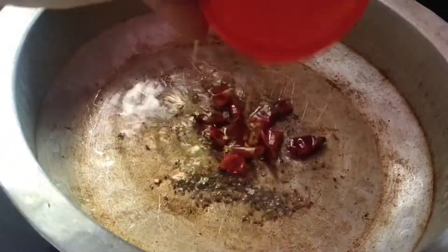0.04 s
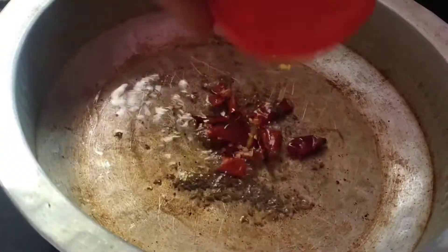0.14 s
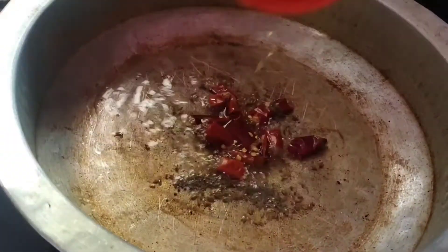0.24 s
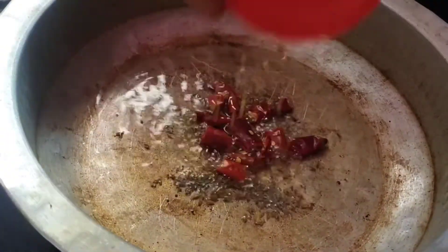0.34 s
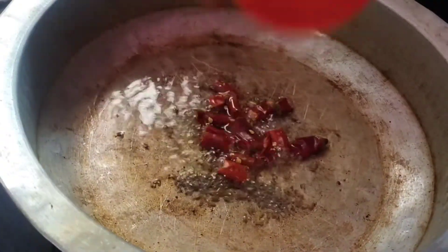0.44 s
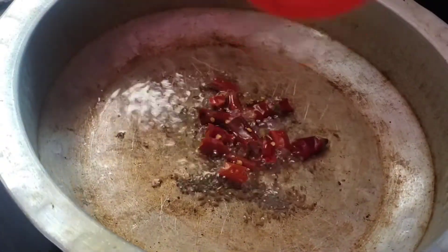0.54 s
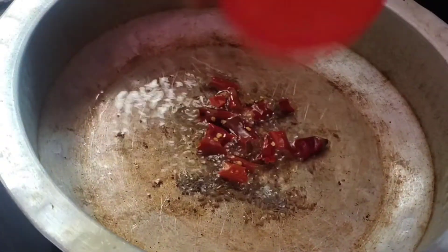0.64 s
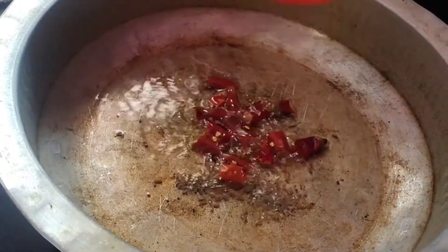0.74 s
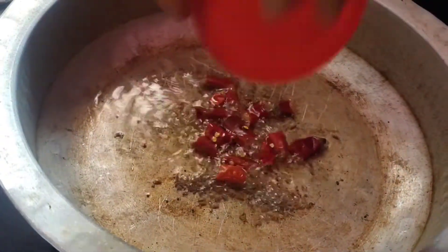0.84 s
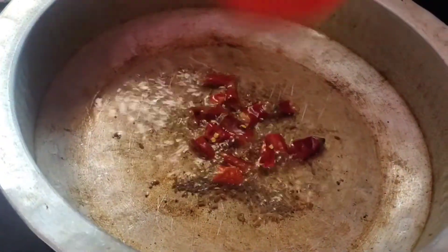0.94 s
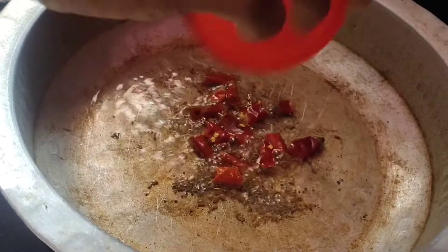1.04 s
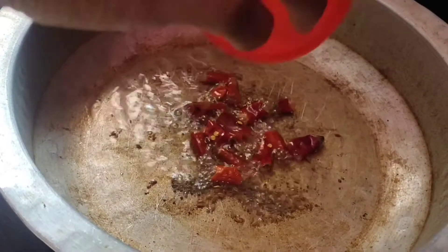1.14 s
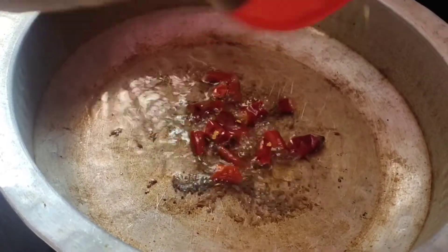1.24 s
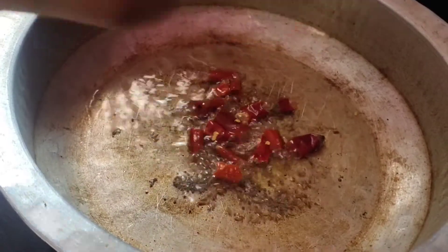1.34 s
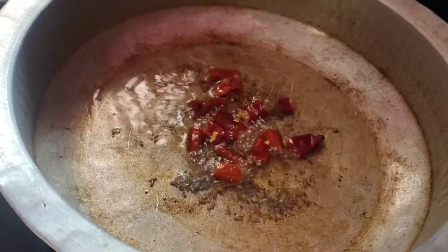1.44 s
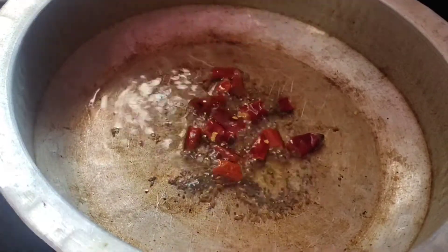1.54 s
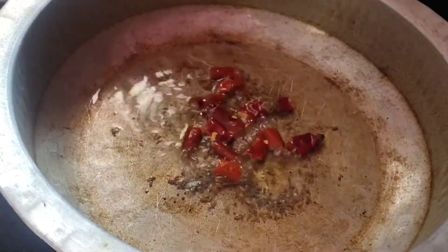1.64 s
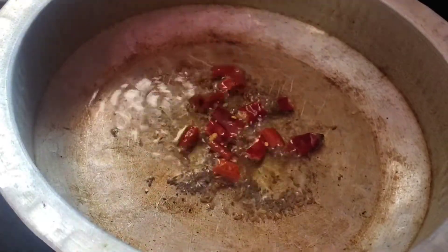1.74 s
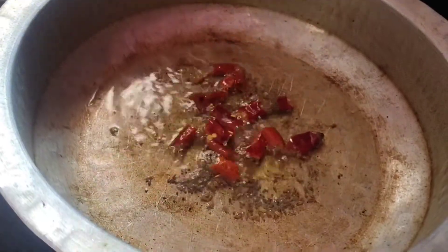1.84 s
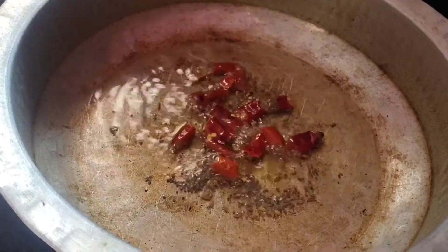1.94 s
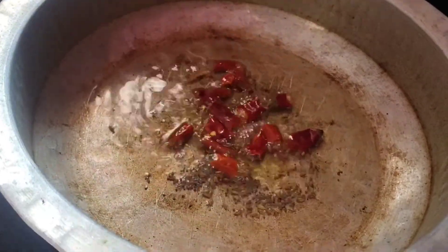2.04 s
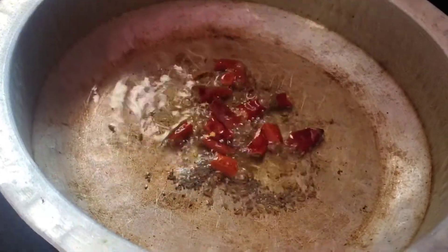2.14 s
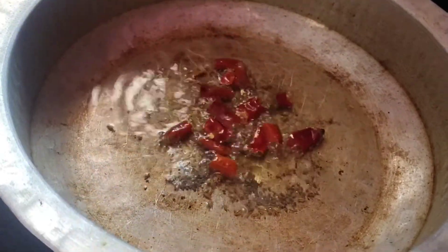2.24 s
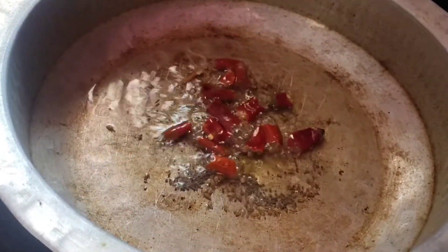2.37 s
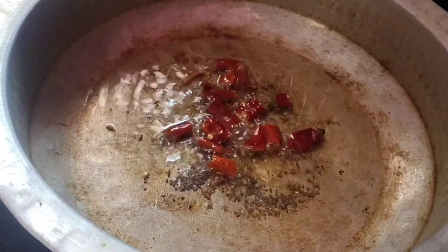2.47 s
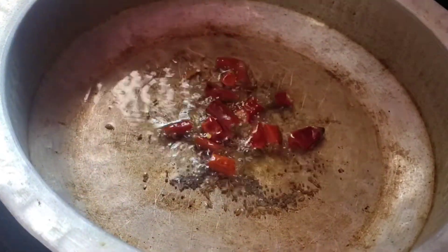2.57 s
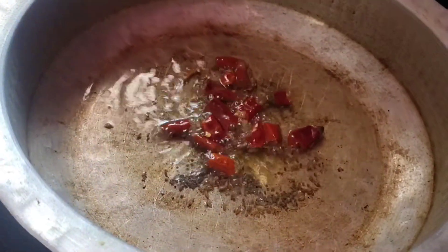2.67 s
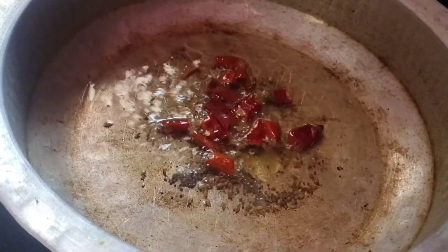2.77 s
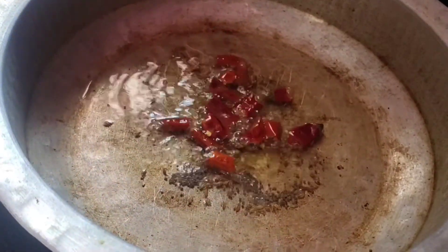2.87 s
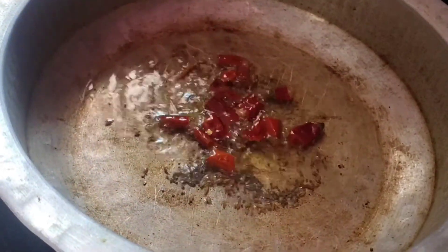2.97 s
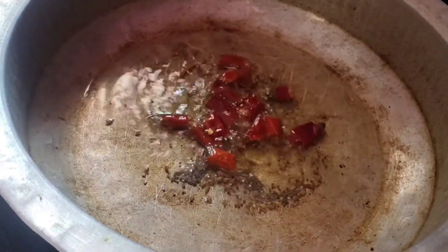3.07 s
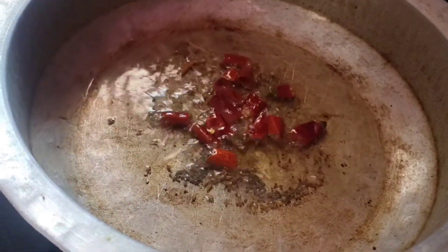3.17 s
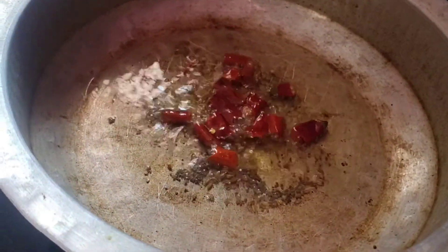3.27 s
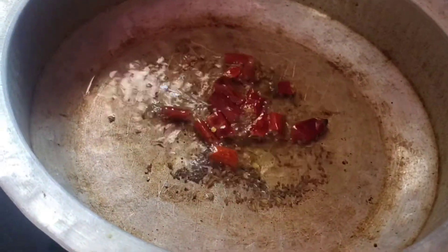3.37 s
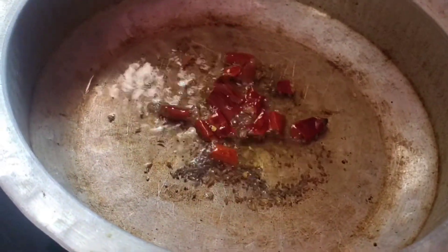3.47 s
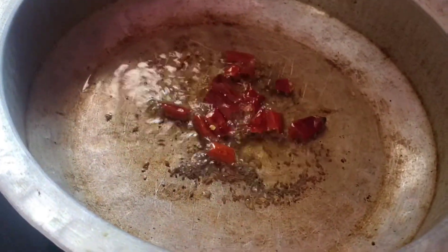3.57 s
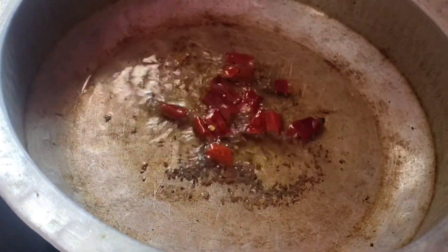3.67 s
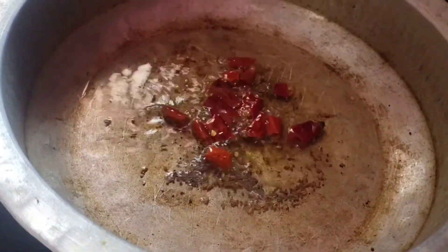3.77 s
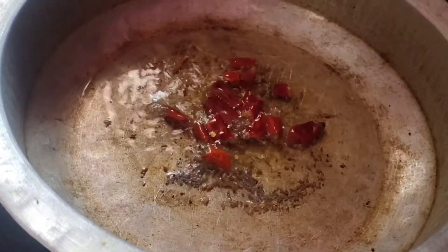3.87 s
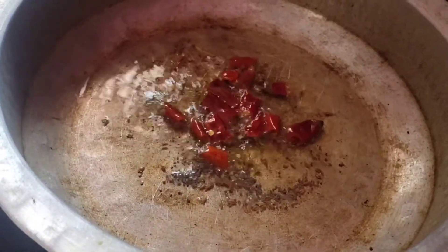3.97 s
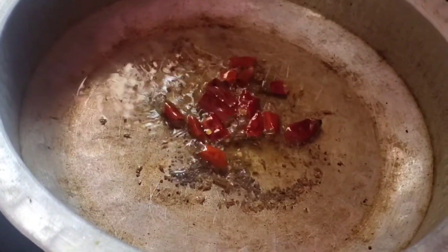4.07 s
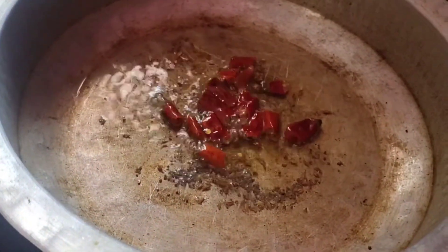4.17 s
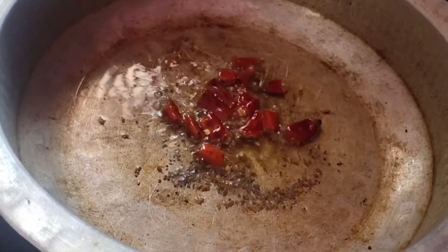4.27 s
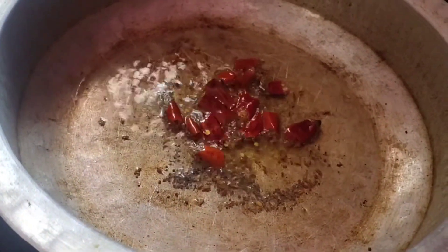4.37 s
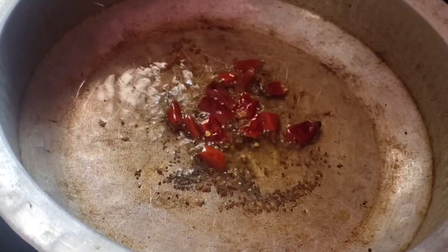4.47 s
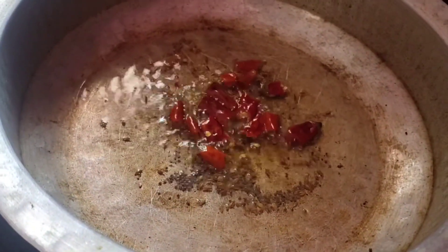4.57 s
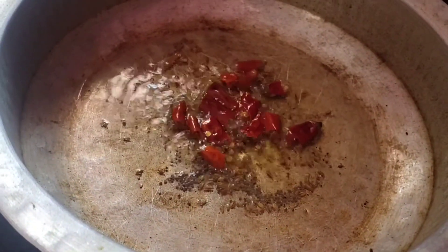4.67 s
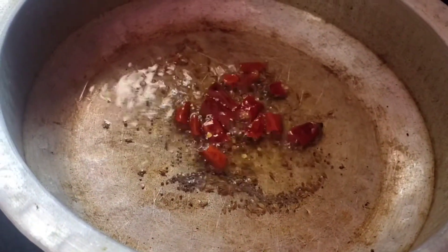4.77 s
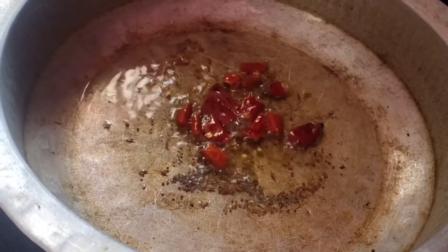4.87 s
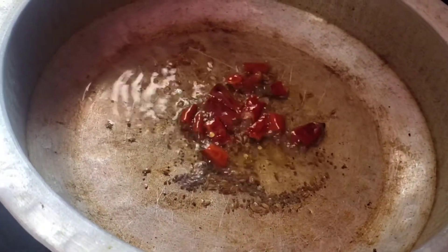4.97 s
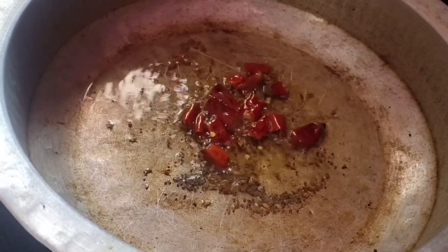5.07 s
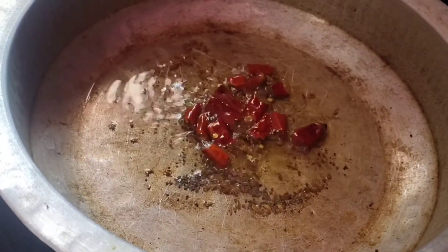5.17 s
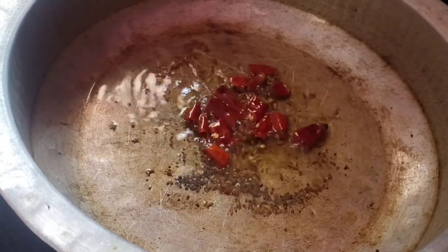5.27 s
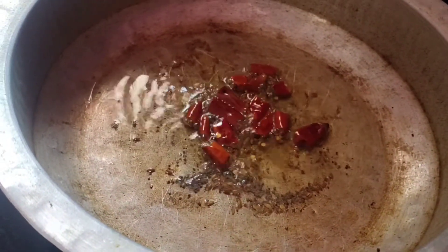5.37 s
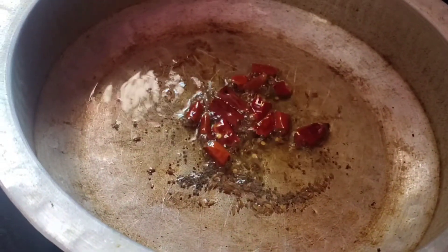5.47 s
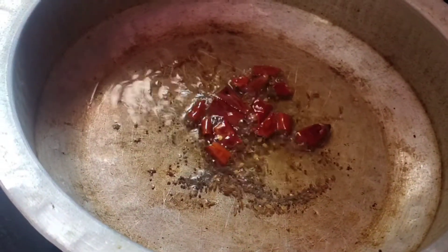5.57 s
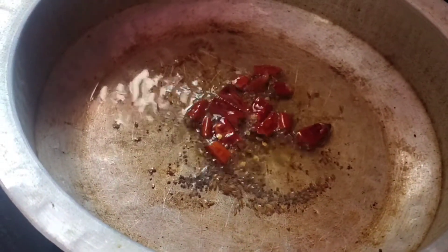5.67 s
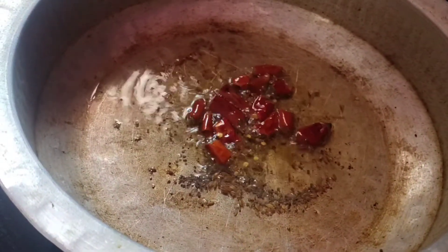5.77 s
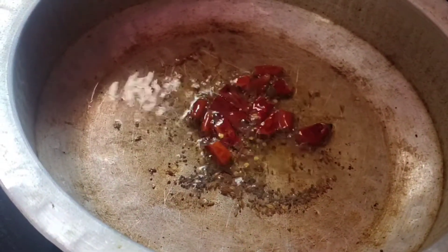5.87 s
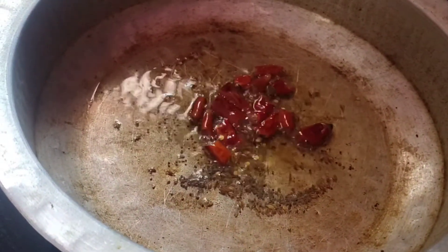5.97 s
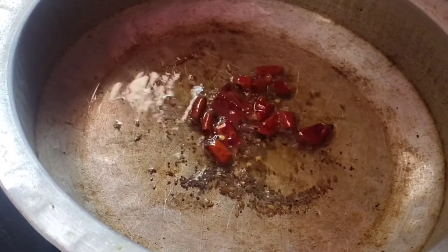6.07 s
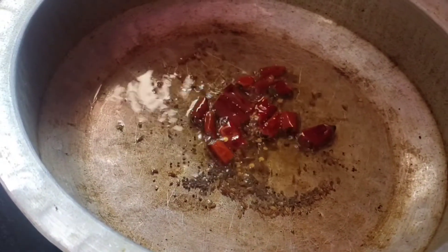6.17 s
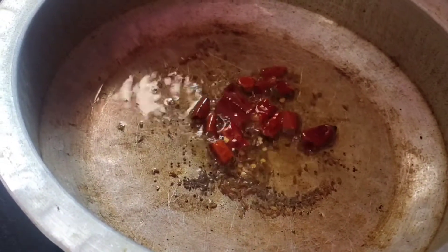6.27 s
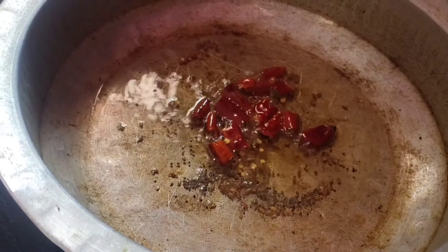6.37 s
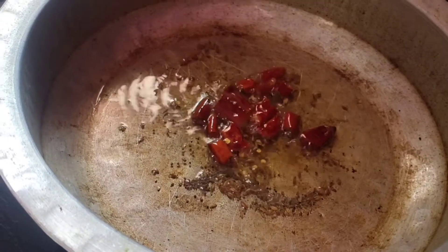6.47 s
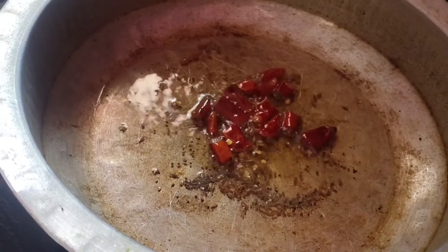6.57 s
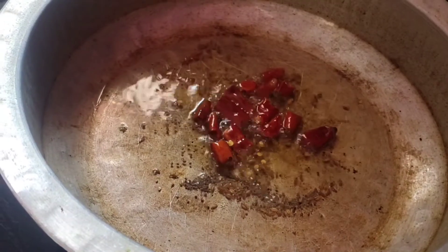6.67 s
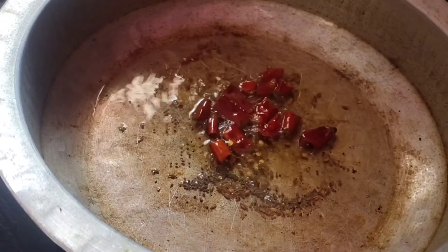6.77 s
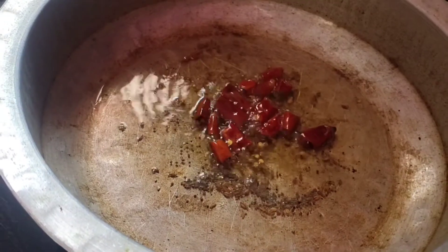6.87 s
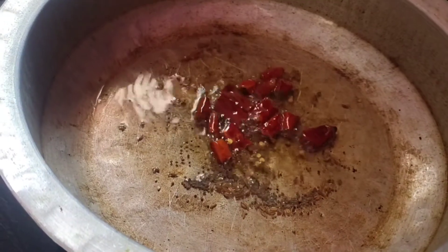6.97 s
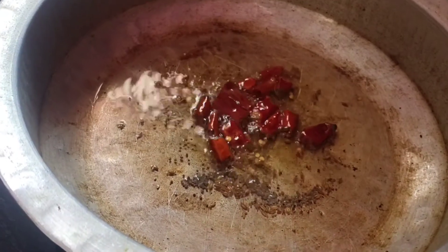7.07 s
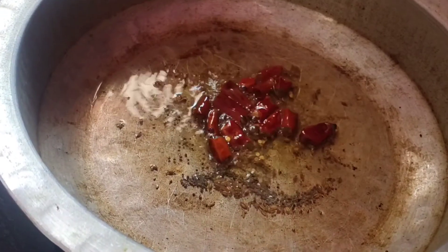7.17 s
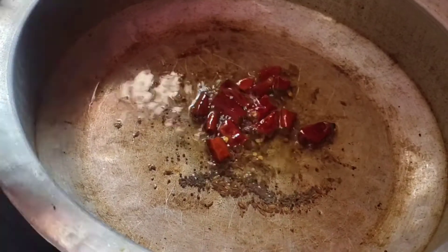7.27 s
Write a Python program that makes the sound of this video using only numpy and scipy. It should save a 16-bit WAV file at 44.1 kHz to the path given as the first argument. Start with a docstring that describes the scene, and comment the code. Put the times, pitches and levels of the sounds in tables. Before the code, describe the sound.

Close, crisp frying in a metal pot: a sudden splutter, then thin steady sizzle scattered with pitched pops and crackles that gradually thin out.

```python
"""Dried chillies and whole spices fry in a little hot oil in a wide metal pot, close to the microphone.
Countless tiny steam bubbles, made as random clicks and noise, are coloured into the sizzle.
Larger bubbles burst with a short pitched pop or a dry, bright spit: a decaying sine and a noise snap.
Steam whistles and oil gurgles faintly; the pot and a small kitchen throw the frying back.
Below lie a noise drone with a hum, and dull low tones, thuds and soft bumps of filtered noise."""
import sys
import numpy as np
from scipy import signal
from scipy.fft import rfft, irfft
from scipy.io import wavfile

SR = 44100
rng = np.random.default_rng(int(sys.argv[2]) if len(sys.argv) > 2 else 0)


def wav_record(signal):
    """Record a signal, one row per channel, as 16-bit PCM in the file named by sys.argv[1]."""
    frames = np.transpose(np.atleast_2d(signal))
    bounded = np.clip(frames, -1, 1)
    # unit amplitude maps onto the largest positive 16-bit level
    quanta = np.round(bounded * 32767).astype(np.int16)
    wavfile.write(sys.argv[1], SR, quanta)


N = 323017
TIME = np.arange(N) / SR  # seconds
BURST_SCALE = np.sqrt(SR / 200)  # makes a burst's level its rms over 5 ms
SMALL_RING_CYCLES = 1.2  # ring of the small bursts


def gain_of(db):
    """Decibels to amplitude."""
    return 10 ** (np.asarray(db) / 20)


def evened(x):
    """Scales to rms 1."""
    return x / np.sqrt(np.mean(x ** 2) + 1e-20)


def unit(x):
    """Scales to energy 1."""
    return x / np.sqrt(np.sum(x ** 2) + 1e-20)


def read(points, hz):
    """Reads the second column of a table at any frequency, on a log-frequency axis."""
    f, value = np.transpose(points)
    return np.interp(np.log(hz + 1), np.log(f + 1), value)


def add(mix, s, sound):
    """Mixes a sound in at time s."""
    part = mix[max(round(s * SR), 0):][:len(sound)]
    part += sound[:len(part)]


def colour(x, points, size=4096):
    """Causal, minimum-phase filter with the given spectrum."""
    log_gain = np.log(gain_of(read(points, abs(np.fft.fftfreq(size, 1 / SR)))))
    taps = np.fft.ifft(np.exp(np.conj(signal.hilbert(log_gain)))).real
    return signal.fftconvolve(x, taps[:size // 2])[:len(x)]


def cut(x, hz, kind, order=2):
    """Low-, high- or band-pass."""
    return signal.sosfilt(signal.butter(order, hz, kind, fs=SR, output="sos"), x)


def drift(hz):
    """Slow random motion of rms 1, its speed limited to about hz."""
    t = np.arange(0, TIME[-1] + 1, 1 / 500)
    spectrum = rfft(rng.standard_normal(len(t)))
    slow = irfft(spectrum / (1 + (np.fft.rfftfreq(len(t), t[1]) / hz) ** 4), len(t))
    return evened(np.interp(TIME, t, slow))


def scatter(t, start, decay):
    """A cluster of random reflections that begins at start and dies away."""
    return unit(rng.standard_normal(len(t)) * (t >= start) * np.exp(-t / decay))


def crackle(per_s, spread_db):
    """Tiny bursts at random moments, most small and a few large."""
    size = gain_of(abs(spread_db) * np.minimum(rng.exponential(1, N), 5))
    return size * rng.choice([-1, 1], N) * (rng.random(N) < per_s / SR)


def drone(level_db=-55.0, swell_db=3.0, hum_hz=155, hum_db=-60.5):
    """A low rumble of noise that swells at random, with a wavering hum and its octave in it."""
    # Low drone of the kitchen. Each row: frequency in Hz, relative level in dB per Hz.
    rumble_colour = [(25, -38), (45, -11.5), (58, -11), (75, -10.5), (100, -6), (130, 1.5), (175, 1.5),
                     (230, -9), (280, -22), (400, -28.5), (900, -41.5), (2500, -42)]
    rumble = evened(colour(rng.standard_normal(N), rumble_colour))
    rumble = rumble * gain_of(level_db + swell_db * drift(hz=1.5))
    phase = 2 * np.pi * np.cumsum(hum_hz + 3 * drift(hz=5.5)) / SR
    tone = np.sin(phase) + gain_of(-24.0) * np.sin(2 * phase)
    hum = evened(tone * gain_of(drift(hz=3.3)))  # wavers by about 1 dB
    return rumble + gain_of(hum_db) * hum


def thud(db, band_hz, t60, rise):
    """A dull blow smeared by the room: a band of noise that swells and dies."""
    t = np.arange(SR // 2) / SR
    body = evened(cut(rng.standard_normal(len(t)), band_hz, "bandpass"))
    return body * gain_of(db - 60 * t / t60) * (1 - np.exp(-t / rise))


def low_tones_and_bumps(bump_db=-1.0, spread=0.46, low_hz=470, t60=0.29):
    """Dull low tones and thuds, many the low part of a pop ringing the pot, and soft low bumps."""
    # Dull low tones and thuds, many of them the low part of a pop ringing the pot.
    # Each row: start in seconds, tone level in dB, pitch in Hz, thud level in dB.
    low_rows = [(0.009, -42.5, 792, -43), (0.229, -44, 770, -60), (0.811, -54, 1040, -50.5),
                (0.855, -52, 560, -54), (0.862, -47, 1134, -45), (0.974, -51, 893, -46),
                (1.057, -52, 948, -43), (2.848, -52.5, 763, -66), (2.948, -49, 596, -66),
                (3.005, -46, 636, -45), (3.253, -46.5, 761, -48), (3.369, -46.5, 774, -58),
                (3.896, -49.5, 740, -57), (4.009, -46.5, 594, -43.5), (4.378, -53, 873, -58),
                (4.428, -46.5, 750, -57), (4.732, -46, 781, -44), (4.901, -47.5, 596, -44.5),
                (5.18, -57.5, 735, -68), (5.577, -48, 750, -62), (5.72, -56, 924, -67),
                (6.237, -54, 575, -53), (6.568, -55.5, 714, -60), (6.741, -53.5, 597, -61)]
    # Soft low bumps. Each row: start in seconds, relative level in dB, upper edge in Hz.
    bump_rows = [(0.613, -31.5, 161), (0.849, -44, 400), (3.849, -37, 320), (3.955, -32, 283),
                 (4.894, -29, 323), (5.013, -33.5, 208), (6.731, -35.5, 156)]
    out = np.zeros(N)
    for s, tone_db, hz, thud_db in low_rows:
        dull = thud(thud_db, [hz / (1 + spread), hz * (1 + spread)], t60, rise=0.00049)
        add(out, s, cut(dull, low_hz, "highpass", order=4))
        add(out, s, thud(tone_db, [hz * 0.98, hz * 1.02], t60, rise=0.003))
    for s, db, top_hz in bump_rows:
        add(out, s, thud(db + bump_db, [105, top_hz], t60, rise=0.027))
    return out


def kitchen(x, wet_db=-7.0):
    """A short diffuse tail of at most half a second, the highest treble dying first."""
    # Decay of the kitchen. Each row: frequency in Hz, time to fall 60 dB in seconds.
    room_decay = [(500, 1), (2000, 0.37), (3500, 0.26), (8000, 0.38), (15000, 0.097)]
    tail = rng.standard_normal(SR // 2) * (np.arange(SR // 2) / SR > 0.006)
    hz, t, z = signal.stft(tail, SR, nperseg=256)
    fading = z * gain_of(-60 * t / read(room_decay, hz)[:, None])
    tail = signal.istft(fading, SR, nperseg=256)[1]
    return gain_of(wet_db) * signal.fftconvolve(x, unit(tail))[:N]


def pot(x, ring_db=-17.0):
    """The metal rings faintly along with the frying, as a sum of decaying modes."""
    # Ring of the pot. Each row: mode in Hz, relative level in dB, time to fall 60 dB in seconds.
    mode_rows = [(1664, 11.5, 0.32), (1997, -5, .4), (2140, -2, 0.32), (2280, -29, 0.51), (2810, -6, 0.3),
                 (3000, -8, 0.13), (3800, -8, 0.27), (5080, -6, .2)]
    t = np.arange(SR // 2) / SR
    modes = sum(gain_of(db - 60 * t / t60) * np.sin(2 * np.pi * hz * t) for hz, db, t60 in mode_rows)
    return gain_of(ring_db) * signal.fftconvolve(x, unit(modes) / 2)[:N]


def pot_base(x, mode_hz=750, level_db=-14.5, t60=0.23, width=0.036):
    """Each burst also shakes the base of the pot, which hums dully around its lowest mode."""
    t = np.arange(SR // 2) / SR
    band = [mode_hz / (1 + width), mode_hz * (1 + width)]
    ring = cut(rng.standard_normal(len(t)), band, "bandpass") * gain_of(-60 * t / t60)
    return gain_of(level_db) * signal.fftconvolve(cut(x, 820, "lowpass"), unit(ring))[:N]


def whistle(width_hz=34.0):
    """Steam leaving a chilli sings in a few narrow, unsteady tones, in jets that swell and fade."""
    # Tones of the thin whistle. Each row: frequency in Hz, relative level in dB.
    tone_rows = [(2585, 0.5), (3330, 0), (3695, 6.5)]
    # Jets of steam. Each row: start in seconds, length in seconds, relative level in dB.
    jet_rows = [(1.95, 0.74, -56.5), (5.42, 0.81, -53)]
    tones = np.zeros(N)
    for hz, db in tone_rows:
        phase = 2 * np.pi * hz * TIME
        tones += gain_of(db) * (drift(width_hz) * np.cos(phase) + drift(width_hz) * np.sin(phase))
    swell = np.zeros(N)
    for s, length, db in jet_rows:
        progress = np.clip((TIME - s) / length, 0, 1)
        swell += gain_of(db) * np.sqrt(abs(np.sin(np.pi * progress)))
    return tones * swell


def gurgle(level_db=-67.5, count=5):
    """Larger, slower bubbles come and go beneath the sizzle, each size in its own time."""
    # Low gurgle of the oil. Each row: frequency in Hz, relative level in dB per Hz.
    gurgle_colour = [(300, -34), (700, 0), (900, -10), (1120, 15), (1300, -10), (1500, -14), (2500, -20)]
    bubbles = evened(colour(crackle(per_s=900, spread_db=2.5), gurgle_colour))
    edges = np.geomspace(450, 1900, count + 1)  # Hz
    out = np.zeros(N)
    for band in zip(edges, edges[1:]):
        swing_db = 9 * np.tanh(0.7 * drift(hz=6))
        out += cut(bubbles, band, "bandpass") * gain_of(swing_db)
    return gain_of(level_db) * out


def sizzle(bubbling_db=-2.5, fizz_db=-4.0, flutter_db=1.7, wash_db=-2.5):
    """Micro-bubbles at the edges of the spices, heard directly and as a wash from pot and walls."""
    # Strength of the frying.
    # Each row: time in seconds, relative level of the bubbling in dB, of the fine fizz in dB.
    frying_rows = [(0.0, -27.5, -23), (0.15, -41.5, -43), (0.4, -42, -34.5), (0.7, -36.5, -37),
                   (1.25, -42, -34.5), (1.9, -39.5, -36), (2.4, -41.5, -37), (3.3, -42, -40),
                   (3.55, -40, -39), (3.75, -40, -36.5), (4.3, -42.5, -37.5), (5.25, -43.5, -40),
                   (5.85, -41.5, -40), (7.32, -44, -41)]
    # Colour of the bubbling. Each row: frequency in Hz, relative level in dB per Hz.
    bubbling_colour = [(400, -61), (1100, -36), (1500, -33), (1640, -16.5), (2050, -3.5), (2450, -7),
                       (2600, -0.5), (3600, -0.5), (4400, -6.5), (5000, -5), (5900, -16), (8000, -48)]
    # Colour of the fizz. Each row: frequency in Hz, relative level in dB per Hz.
    fizz_colour = [(2000, -44), (5500, -8.5), (6600, 4.5), (7400, -2), (8300, 8), (9100, 4.5), (9900, 6),
                   (11000, 2.5), (12200, 0.5), (13400, 8.5), (15300, 8), (15480, 13), (15700, -48)]
    s, bubbling, fizz = np.transpose(frying_rows)
    flutter = flutter_db * drift(hz=20.0)  # shared by both layers
    layers = ((crackle(per_s=6000, spread_db=2.8), bubbling_colour, bubbling + bubbling_db),
              (crackle(per_s=11000, spread_db=0.5), fizz_colour, fizz + fizz_db))
    out = np.zeros(N)
    for bursts, spectrum, level in layers:
        dense = evened(bursts) + gain_of(wash_db) * rng.standard_normal(N)
        out += evened(colour(dense, spectrum)) * gain_of(np.interp(TIME, s, level) + flutter)
    return out


def echoes(t, wall_db, near_db, wall_decay):
    """The direct sound, then the pot's walls, then a nearby surface; drawn anew for each burst."""
    walls = gain_of(wall_db) * scatter(t, start=0.0009, decay=wall_decay)
    surface = gain_of(near_db) * scatter(t, start=0.0096, decay=0.0025)
    return (t == 0) + walls + surface


def tick(db, low_hz=13400, high_hz=15100, decay=0.0011):
    """The tiniest droplets flash off in a very high, short hiss."""
    t = np.arange(2048) / SR
    hiss = cut(rng.standard_normal(len(t)) * np.exp(-t / decay), [low_hz, high_hz], "bandpass")
    reflections = echoes(t, wall_db=-12.0, near_db=-16.0, wall_decay=0.0027)
    hiss = signal.fftconvolve(hiss, reflections)[:len(t)]
    return BURST_SCALE * gain_of(db) * unit(hiss)


def pop(pop_db, hz, cycles, snap_db, rise=0.00007, sag=0.21):
    """The film of oil snaps, and the opened cavity rings a few cycles, its pitch settling."""
    # Colour of a snap. Each row: frequency in Hz, relative level in dB per Hz.
    snap_colour = [(300, -38.5), (900, -23.5), (1700, -15), (3000, -11.5), (5500, -10), (7400, 0),
                   (8700, 4.5), (9900, 3.5), (11800, -0.5), (13700, 1), (15300, 5), (16500, -31)]
    t = np.arange(2048) / SR
    # the pitch falls from 1.07 to 0.86 of hz
    turns = np.cumsum(hz * (0.86 + sag * np.exp(-t / 0.00064))) / SR
    ring = np.sin(2 * np.pi * turns) * np.exp(-t * hz / max(cycles, 0.4)) * (1 - np.exp(-t / rise))
    ring = cut(ring, hz * 0.53, "highpass", order=4)
    ring_echoes = echoes(t, wall_db=2.0, near_db=-21.0, wall_decay=0.0022)
    ring = signal.fftconvolve(ring, ring_echoes)[:len(t)]
    tear = unit(np.sign(rng.standard_normal(len(t))) * np.exp(-t / 0.0003))
    snap_echoes = echoes(t, wall_db=-2.5, near_db=-8.0, wall_decay=0.0035)
    snap = signal.fftconvolve(colour(tear, snap_colour), snap_echoes)[:len(t)]
    return BURST_SCALE * (gain_of(pop_db) * unit(ring) + gain_of(snap_db) * unit(snap))


def splutter(low_hz=2100, high_hz=4200, snap_db=-14.0, count=12):
    """A moist spot boils off in a quick cluster of bursts."""
    # Quick clusters. Each row: start in seconds, length in seconds, pop level of each burst in dB.
    cluster_rows = [(0.008, 0.037, -35.5), (3.882, .007, -45), (6.541, .02, -44.5)]
    out = np.zeros(N)
    for start, length, db in cluster_rows:
        for k, pitch in enumerate(rng.random(count)):
            hz = low_hz * (high_hz / low_hz) ** pitch
            add(out, start + length * k / count, pop(db, hz, SMALL_RING_CYCLES, db + snap_db))
    return out


def pops(level_db=1.0, spit_db=2.5, small_db=-38.5, count=80):
    """The large bursts and spits, and small ones that thin out as the spices dry."""
    # Large bubbles that burst with a pitched pop. Each row: start in seconds, relative pop level in dB,
    # nominal pitch in Hz, decay of the ring in cycles (at least 0.4 is used), relative snap level in dB.
    pop_rows = [(0.022, -18, 3730, .6, -26), (0.231, -24.5, 3530, 0.77, -50), (0.4185, -24, 3050, 7.5, -32),
                (0.599, -21.5, 3400, 3.6, -60), (0.6073, -24.5, 4470, 0.87, -26.5),
                (0.689, -24, 3670, 1.1, -27.5), (0.7102, -27, 3900, 1.5, -33),
                (0.7407, -21.5, 3380, 1.9, -44), (0.8421, -24.5, 3700, 1.1, -27.5),
                (1.0579, -26, 3300, 0.82, -21), (1.3961, -21.5, 3700, 1.8, -30),
                (1.4338, -20, 3310, 3.1, -37), (1.4806, -15, 3330, 4, -28.5),
                (1.585, -17.5, 3800, 1.25, -27.5), (1.693, -25, 3700, 1.5, -33),
                (1.705, -23, 4150, .8, -30), (1.8265, -20, 4100, 1.4, -26.5),
                (1.901, -20.5, 3440, 1.5, -24), (2.5281, -15.5, 3220, 0.78, -28),
                (2.841, -24.5, 3040, 3.2, -55), (2.8487, -21.5, 3450, 1.4, -23),
                (3.042, -21.5, 3670, 1.5, -40), (3.3667, -16, 2820, 1.14, -29),
                (3.4686, -19.5, 3070, 1.3, -28), (3.5436, -13, 2900, 2.3, -24.5),
                (3.5907, -21.5, 3500, 1.1, -37), (3.8891, -18, 2920, 1, -22),
                (4.3806, -20, 3540, 2.5, -24.5), (4.735, -17, 2670, 0.76, -29),
                (4.7617, -17.5, 3060, 2, -34.5), (4.9215, -22, 3530, 1.14, -32.5),
                (5.4112, -27, 3850, 1.7, -42), (5.7642, -25, 4100, 1.4, -27.5),
                (5.9231, -30.5, 3500, 0.31, -40), (6.062, -30, 4780, .9, -39),
                (6.562, -28, 4000, .4, -27.5)]
    # Dry, bright spits of water in the oil, with hardly any pitch.
    # Each row: start in seconds, relative snap level in dB, level of the high tick in dB.
    spit_rows = [(0.0836, -24, -42), (0.1483, -25, -38), (0.3535, -23.5, -40), (0.5463, -32, -25.5),
                 (0.7676, -26.5, -20), (0.7796, -28.5, -20), (0.81, -31.5, -45), (0.973, -20.5, -24),
                 (1.131, -29.5, -28), (1.7513, -23.5, -40), (2.2549, -29.5, -29), (2.7766, -28, -24),
                 (3.0011, -28, -45), (3.0713, -32, -35), (3.225, -20.5, -38), (3.249, -27.5, -40),
                 (3.343, -26.5, -24), (3.7149, -37.5, -45), (3.7487, -29.5, -43), (3.7675, -31, -29),
                 (4.053, -25, -28), (5.06, -28.5, -30), (5.1407, -25.5, -42), (5.6545, -26, -28),
                 (6.2886, -29.5, -27), (6.3969, -36, -36), (6.8914, -38.5, -44)]
    spit_hz, spit_ring_db, spit_cycles = 3770, -7.5, 0.65  # ring level is against the snap
    out = np.zeros(N)
    for s, pop_db, hz, cycles, snap_db in pop_rows:
        add(out, s, pop(pop_db + level_db, hz, cycles, snap_db + level_db))
    for s, db, high_db in spit_rows:
        snap_db = db + spit_db
        add(out, s, pop(snap_db + spit_ring_db, spit_hz, spit_cycles, snap_db) + tick(high_db))
    for when, size, pitch, sharpness in rng.random((count, 4)):
        db = small_db + 6 * (0.5 - when) + 9 * (size ** 2 - 0.4)
        small = pop(db, 2700 + 1800 * pitch, SMALL_RING_CYCLES, db + 10 * (sharpness - 0.5))
        add(out, TIME[-1] * when ** 1.6, small)  # the power crowds them towards the start
    return out


def scene():
    """Everything is central, except for a modest added treble scatter of the bursts at the sides."""
    # Added side scatter. Each row: frequency in Hz, level against the bursts in dB.
    side_colour = [(2500, -70), (4000, -34), (5200, -11), (8000, -9), (16000, -17)]
    bursts, bed = pops() + splutter(), sizzle()
    frying = bursts + bed
    mid = frying + pot(frying) + pot_base(bursts) + kitchen(bursts)
    mid = mid + gurgle() + whistle() + low_tones_and_bumps() + drone()
    spread = scatter(np.arange(512) / SR, start=0.001, decay=0.002)
    side = colour(signal.fftconvolve(bursts, spread)[:N], side_colour)
    return np.array([mid + side, mid - side])


def record(dry, ceiling=0.71, edge_hz=16700):
    """Soft overload on the loudest pops, then the band limit."""
    held = dry / (1 + (dry / ceiling) ** 4) ** (1 / 4)
    taps = signal.firwin(511, edge_hz, window=("kaiser", 9), fs=SR)
    return signal.oaconvolve(held, taps[None], "same")


dry = scene()
out = record(dry)
wav_record(out)
```